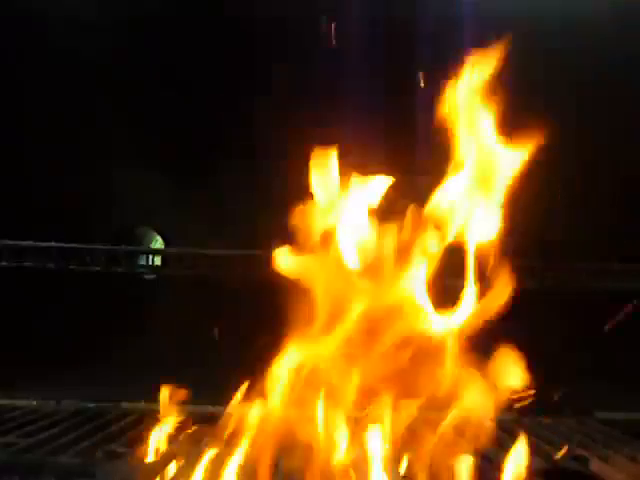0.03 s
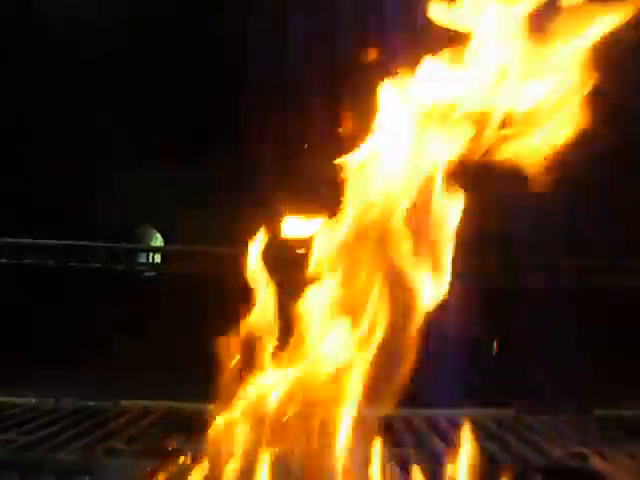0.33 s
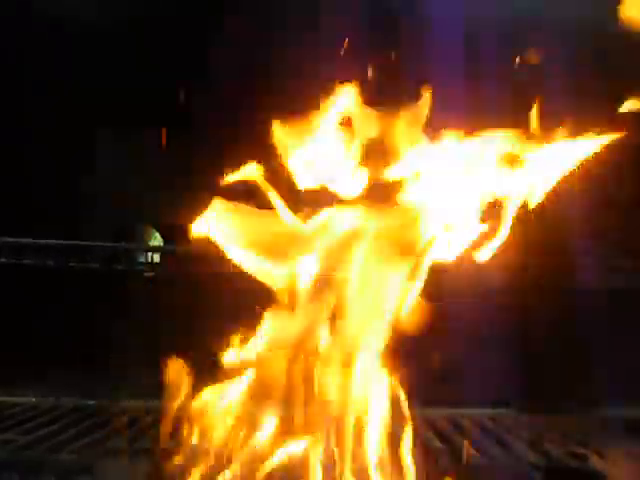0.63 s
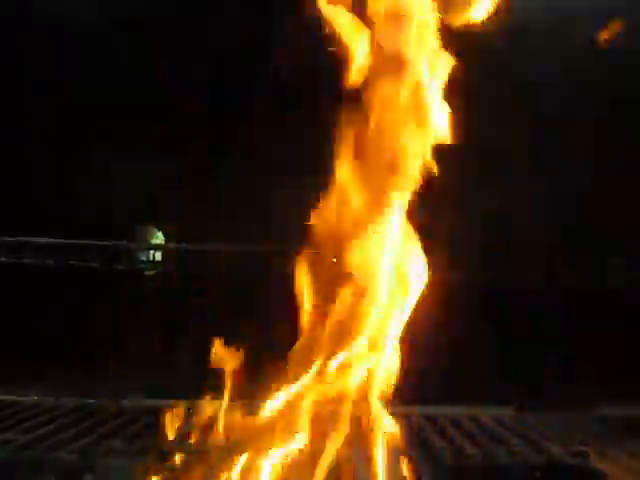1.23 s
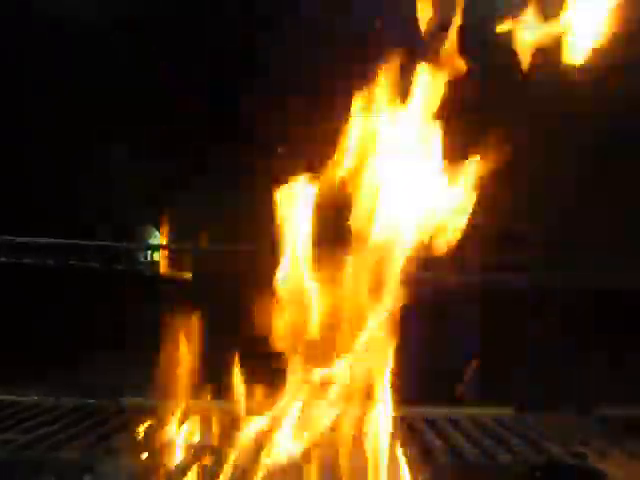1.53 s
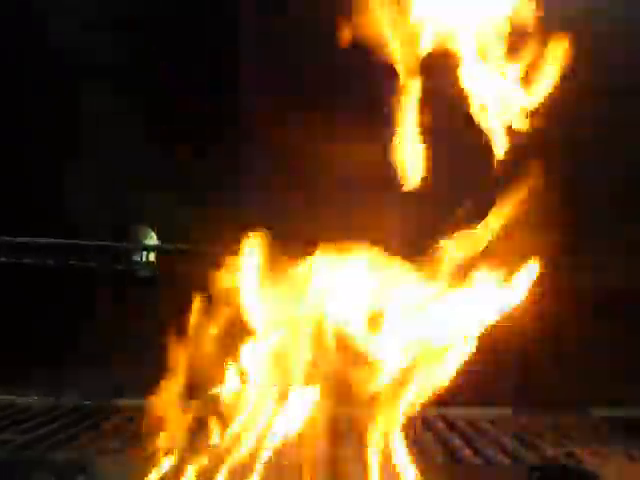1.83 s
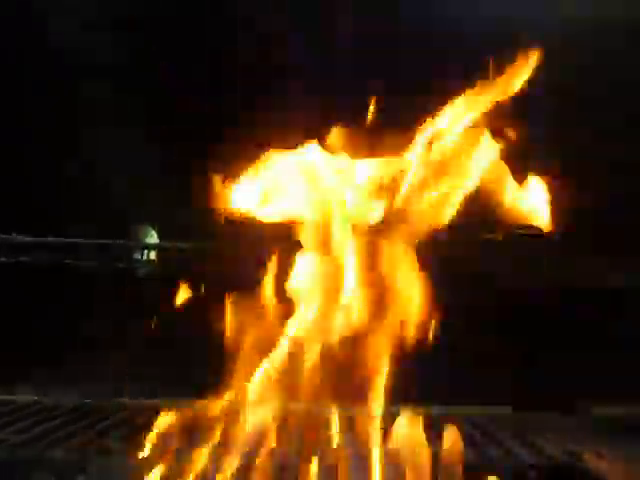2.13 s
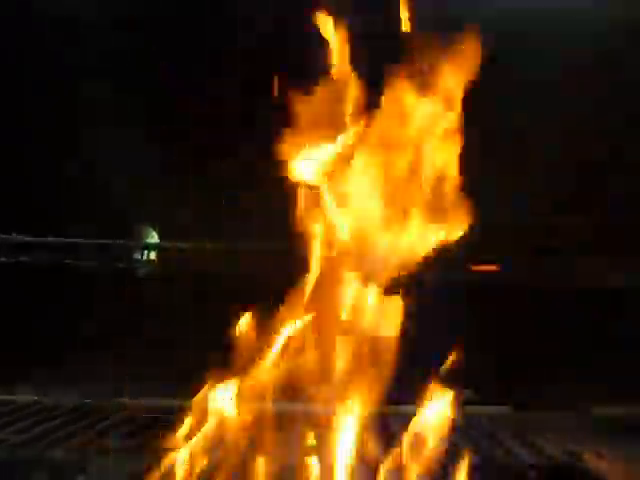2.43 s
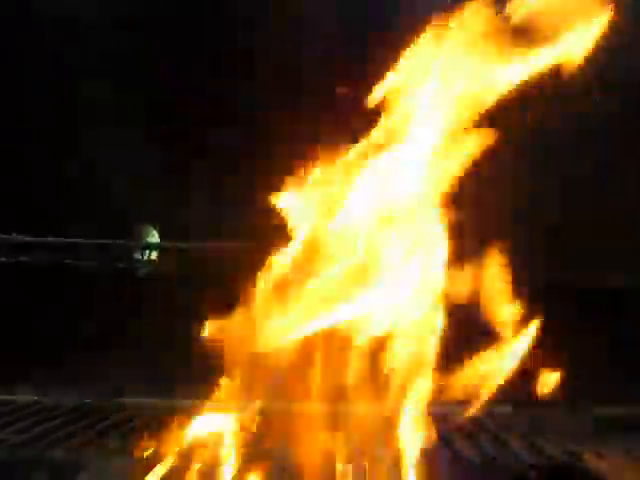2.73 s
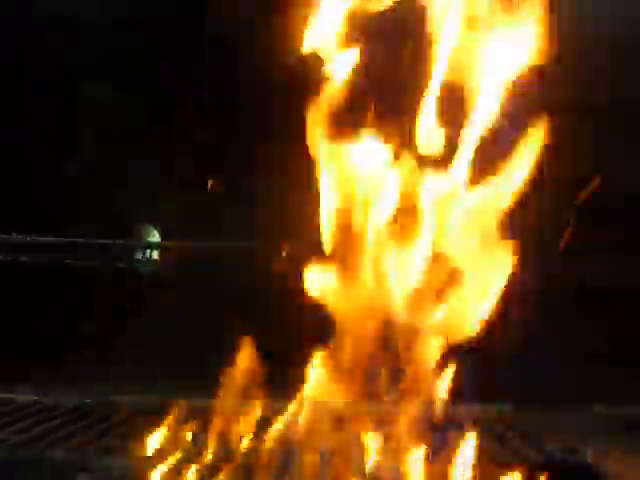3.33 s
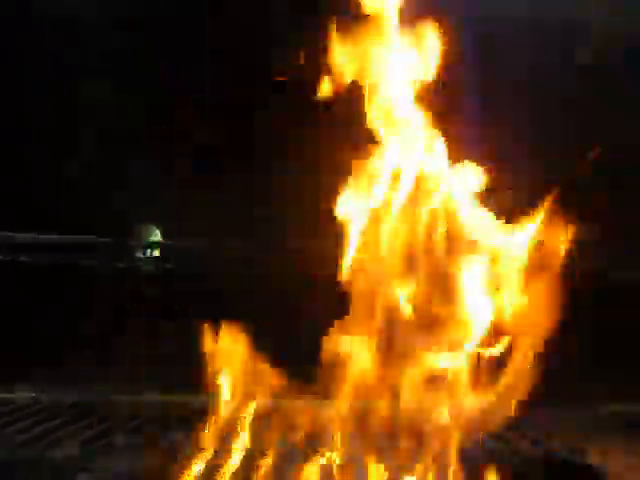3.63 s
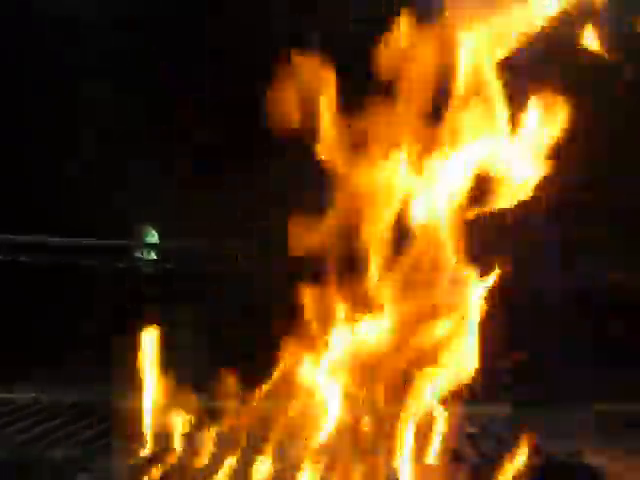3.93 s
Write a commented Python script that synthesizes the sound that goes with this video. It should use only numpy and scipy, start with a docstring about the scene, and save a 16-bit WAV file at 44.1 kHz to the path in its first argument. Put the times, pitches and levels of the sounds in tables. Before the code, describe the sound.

Fire burns close up in a hooded grill, a steady rush and low rumble with soft booming puffs. Small pops crack irregularly against the metal hood over a fine sizzle, while a fan motor hums faintly underneath.

```python
"""Fire in a hooded grill

Close up, flames rush and rumble on the grate, and puffs of flame set the hollow of the grill booming.
The fuel sizzles in tiny bursts; small pops crack out and rattle once around the metal hood.
Underneath, a motor, probably a fan, throbs and hums faintly."""
import sys
import numpy as np
from scipy import signal
from scipy.fft import rfft, irfft
from scipy.io import wavfile

SR = 44100
rng = np.random.default_rng(int(sys.argv[2]) if len(sys.argv) > 2 else 0)


def to_wav(s):
    """Save 16-bit WAV."""
    ch = np.atleast_2d(s).T  # columns
    pcm = np.round(np.clip(ch, -1, 1) * 32767)  # PCM
    wavfile.write(sys.argv[1], SR, pcm.astype(np.int16))


N = 176400


def from_db(db):
    """Decibels to gain."""
    return 10 ** (np.asarray(db) / 20)


def rms_one(x):
    """Scale to an rms of one."""
    return x / np.sqrt(np.mean(x ** 2) + 1e-20)


def energy_one(x):
    """Scale to an energy of one."""
    return x / np.sqrt(np.sum(x ** 2) + 1e-20)


def colour(x, curve):
    """EQ by a curve of f/Hz, gain/dB points."""
    hz, db = np.transpose(curve)
    bins = np.maximum(np.arange(N // 2 + 1) * SR / N, 1)
    gain_db = np.interp(np.log(bins), np.log(hz), db)
    return irfft(rfft(x) * from_db(gain_db), N)


def drift(rate_hz):
    """Slow random wander with a spread of one."""
    bins = np.arange(N // 2 + 1) * SR / N
    slow = irfft(rfft(rng.standard_normal(N)) / (1 + (bins / rate_hz) ** 2), N)
    return rms_one(slow - slow.mean())


def resonate(x, hz, width_hz):
    """One damped resonance."""
    b, a = signal.iirpeak(hz, hz / width_hz, fs=SR)
    return signal.lfilter(b, a, x + 1e-18)


def flames(rush_db=-51, fade_db_per_s=0.37):
    """Turbulent burning gas: a fluttering rush slowly loses strength over a rumble that swells and sinks."""
    # spectrum of the flames' rush: f/Hz, relative level/dB
    rush_spectrum = [(70, -6.5), (110, 4.5), (135, 8), (165, 2.5), (192, 3.5), (225, -1.5), (255, -3),
                     (300, -0.5), (350, -2), (420, -0.5), (490, 0), (550, -1.5), (670, -0.6), (720, 1),
                     (830, 0.5), (910, 0), (1000, -2), (1150, -5), (1250, -6), (1800, -10), (2500, -12),
                     (3500, -18.5), (5000, -22), (7000, -25), (10000, -34.5)]
    # spectrum of the rising flames' low rumble: f/Hz, relative level/dB
    rumble_spectrum = [(8, -11.5), (22, 3.5), (42, -5.5), (72, -1.5), (105, -11), (150, -19.5),
                       (230, -27.5), (400, -47)]
    # swell of the rumble: t/s, level/dB
    swell = [(0, -61), (.8, -52.5), (1.3, -55), (1.8, -56), (2.05, -53.5), (2.21, -48.5), (2.4, -54),
             (2.58, -48), (2.8, -58), (3.17, -51.5), (3.4, -57.5), (4, -55)]
    t = np.arange(N) / SR
    rush = rms_one(colour(rng.standard_normal(N), rush_spectrum))
    rumble = rms_one(colour(rng.standard_normal(N), rumble_spectrum))
    rush_flutter_db = 0.44 * drift(rate_hz=11)
    rumble_flutter_db = 3 * drift(rate_hz=9.9)
    rush *= from_db(rush_db - fade_db_per_s * t + rush_flutter_db)
    rumble *= from_db(np.interp(t, *np.transpose(swell)) + rumble_flutter_db)
    return rush + rumble


def motor(turn_hz=30.02, throb_wander_rad=0.18, tone_wander_rad=0.44):
    """A soft throb on every turn of the motor, and faint fan tones that wander slightly."""
    # first four harmonics of the throb: rms level/dB
    harmonics = [-61.5, -62, -61.5, -59.5]
    # fan tones: f/Hz, rms level/dB
    fan_tones = [(158, -71.5), (237.2, -73.5), (263.5, -80), (402, -71.5), (474.3, -75)]
    t = np.arange(N) / SR
    turn = 2 * np.pi * turn_hz * t + throb_wander_rad * drift(rate_hz=1)
    throb = sum(from_db(db) * np.cos(k * turn) for k, db in enumerate(harmonics, 1))
    hum = np.zeros(N)
    for hz, db in fan_tones:
        phase = 2 * np.pi * (hz * t + rng.random()) + tone_wander_rad * drift(rate_hz=1)
        hum += from_db(db) * np.sin(phase)
    return np.sqrt(2) * (throb + hum)


def hood(echo_db, delay_s=0.0034, spread_s=0.0017, tail_db=-9, tail_t60_s=0.19, size=4096):
    """Impulse response of the hood: direct sound, a cluster of echoes off the metal, a short tail."""
    t = np.arange(size) / SR
    walls, tail = rng.standard_normal((2, size))
    walls = energy_one(walls * np.exp(-.5 * ((t - delay_s) / spread_s) ** 2))
    tail = energy_one(tail * (t > delay_s) * from_db(-60 * t / tail_t60_s))
    return (t == 0) + from_db(echo_db) * walls + from_db(tail_db) * tail


def sizzle(bursts_per_s=260, level_db=-69, spread_db=2, low_hz=2350, high_hz=6700, bands=10):
    """The fuel sizzles: tiny bursts of varied size and pitch come at random and echo in the hood."""
    out = np.zeros(N)
    for hz in np.geomspace(low_hz, high_hz, bands):
        onsets = rng.random(N) < bursts_per_s / bands / SR
        sizes = from_db(spread_db * np.minimum(rng.exponential(1, N), 3.5))
        polarity = rng.choice([-1, 1], N)
        bursts = resonate(onsets * sizes * polarity, hz, width_hz=3800)
        out += signal.fftconvolve(bursts, hood(echo_db=3.5))[:N]
    return from_db(level_db) * rms_one(out)


def pops(snap_db=-8, trim_db=0.1, size=4096):
    """A pocket in the fuel bursts: splinters ring briefly at the pocket's pitch, with a broad snap."""
    # bursting pockets: t/s, level before trim/dB, f/Hz, bandwidth/Hz, burst decay/ms, hood echo/dB
    pockets = [ (0.0257, -36.5, 3800, 8000, 0.07, -0.5), (.0256, -48.5, 1320, 2440, 0.19, -7),
               (.0256, -46, 3100, 1300, 0.11, -3), (0.033, -52, 2690, 4000, 0.48, -5),
               (.0468, -61, 4500, 7500, .8, 5), (.0848, -55, 5200, 7500, .6, 3),
               (0.184, -53, 5850, 4800, 0.39, -4), (.1984, -62, 5500, 5000, .5, -2),
               (0.3266, -60.5, 6500, 5000, .8, 6), (.3755, -63, 5000, 2300, 0.73, -5),
               (0.4112, -56, 5800, 4500, 0.5, 3), (0.463, -63, 4500, 3000, .3, -3),
               (.776, -59, 5460, 7500, .5, -7), (0.812, -53, 3380, 3800, 0.62, 1),
               (.9468, -59.5, 6600, 3000, .5, -1), (1.0192, -55.5, 2600, 2000, .4, -7),
               (1.0826, -58, 4600, 4500, .6, -1), (1.1, -59, 4600, 1800, .5, -6),
               (1.1279, -52, 5500, 6000, 0.49, 2), (1.599, -65, 4200, 4500, 0.37, 3),
               (1.612, -59, 6000, 6000, .4, 0), (1.7071, -60, 5000, 3800, 1.2, 5),
               (1.726, -58.5, 5800, 6000, .4, 5), (1.8191, -56, 3600, 6000, 0.36, -14),
               (1.8207, -46, 3000, 4500, 1.2, 1), (1.8372, -58, 5000, 5000, .6, 4),
               (1.9206, -50.5, 5770, 3300, 1.5, -5), (1.92, -54.5, 2480, 1000, 1.1, -8),
               (1.9894, -59.5, 5200, 4500, .3, -5), (2.132, -61.5, 4800, 3800, .5, -2),
               (2.271, -53, 4200, 2500, 0.51, -8), (2.4078, -57, 7200, 2000, 0.5, -3),
               (2.4551, -63, 6600, 2700, .4, -1), (2.5001, -49, 4050, 6500, 0.26, -4),
               (2.5738, -56.5, 5500, 6000, 0.28, -3), (2.8177, -55, 4200, 4500, 1.2, -1),
               (2.8721, -50, 3600, 8000, 0.28, -1), (2.887, -53.5, 4000, 6500, 0.89, 2),
               (3.1245, -63, 3900, 2300, .5, 3), (3.214, -61, 4800, 5000, .5, -1),
               (3.229, -53, 3300, 6000, .5, -7), (3.2312, -51.5, 2800, 4500, 0.43, -1),
               (3.3642, -57.5, 6000, 6000, 1, 0), (3.4748, -57.5, 5200, 3500, 0.54, 2),
               (3.482, -56.5, 4830, 5500, 0.67, -3), (3.499, -61, 4600, 3800, .5, 3),
               (3.6, -51, 6670, 706, 0.18, -2), (3.602, -53, 4350, 1000, .1, 1),
               (3.926, -56, 4000, 7500, .5, 0)]
    out = np.zeros(N + 2 * size)
    ms = 1000 * np.arange(size) / SR
    level_window = .005 * SR  # a pop's level is its energy spread over 5 ms
    for onset_s, db, hz, width_hz, decay_ms, echo_db in pockets:
        burst = energy_one(rng.standard_normal(size) * (ms > 0) * np.exp(-ms / decay_ms))
        ring = energy_one(resonate(resonate(burst, hz, width_hz), hz, width_hz))
        snap = energy_one(resonate(burst, hz=3500, width_hz=6500))
        crack = ring + from_db(snap_db) * snap
        pop = energy_one(signal.fftconvolve(crack, hood(echo_db))[:size])
        start = int(onset_s * SR)
        out[start:start + size] += from_db(db + trim_db) * np.sqrt(level_window) * pop
    return out[:N]


def puffs(boom_hz=179, width_hz=55):
    """Each puff of flame swells and dies in the low resonance of the grill's hollow."""
    # bell-shaped puffs of flame: peak t/s, rms level/dB, length/s
    swells = [(0.195, -53.5, 0.061), (0.517, -57.5, 0.11), (.83, -56.5, 0.065), (.95, -56.5, 0.066),
              (1.3, -60.5, 0.29), (1.737, -54, 0.16), (2.084, -56.5, .08), (2.65, -55.5, 0.053),
              (3.01, -55.5, 0.17), (3.18, -52.5, 0.071), (3.842, -57.5, 0.11)]
    t = np.arange(N) / SR
    hollow = resonate(rng.standard_normal(N), boom_hz, width_hz)
    boom = rms_one(resonate(hollow, boom_hz, width_hz))  # second pass for steeper skirts
    envelope = sum(from_db(db) * np.exp(-2 * ((t - peak_s) / length_s) ** 2)
                   for peak_s, db, length_s in swells)
    return boom * envelope


def scene():
    """The fire bed with its puffs, the motor, the sizzle and the pops, mixed in mono."""
    return (flames() + puffs() + motor() + sizzle() + pops())[None]


def record(dry, stopband_hz=10631):
    """A small microphone dulls the top, then a steep low-pass cuts it off."""
    # microphone response: f/Hz, gain/dB
    response = [(6000, 0), (7200, -0.5), (7600, -4.5), (8000, -14), (8600, -7), (9000, -10.5), (9500, -19),
                (10000, -23.5)]
    dulled = np.array([colour(channel, response) for channel in dry])
    low_pass = signal.cheby2(16, 60, stopband_hz, fs=SR, output="sos")
    return signal.sosfilt(low_pass, dulled)


dry = scene()
out = record(dry)
to_wav(out)
```